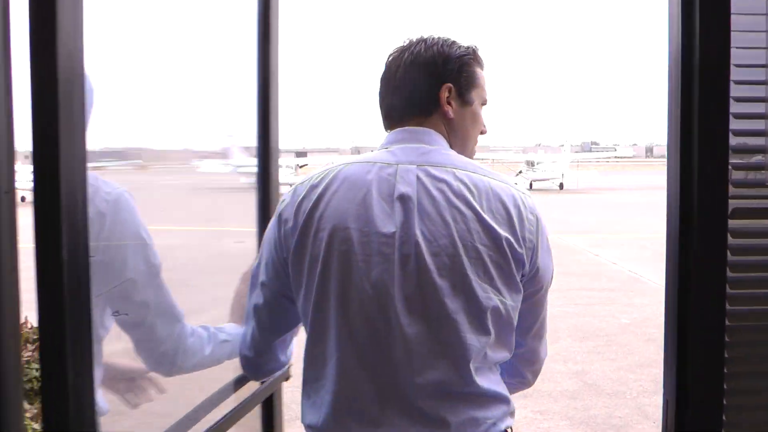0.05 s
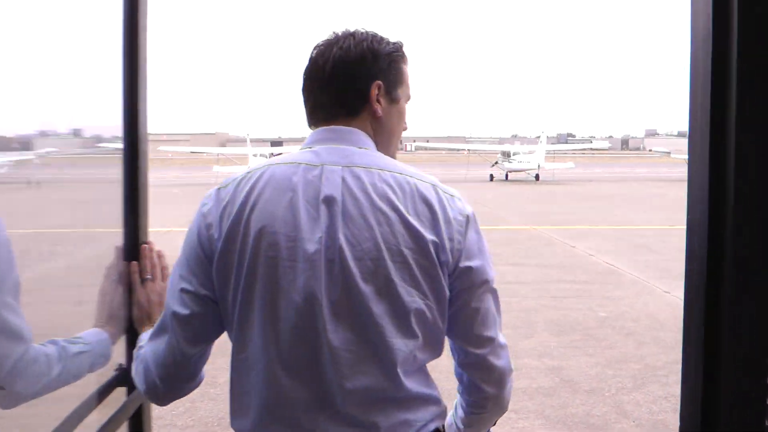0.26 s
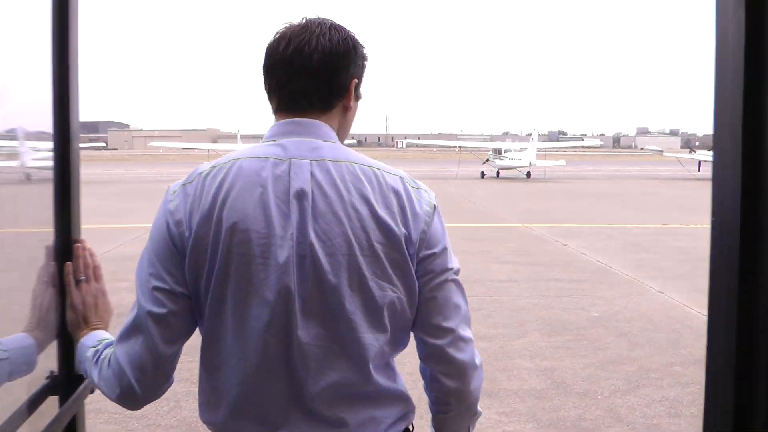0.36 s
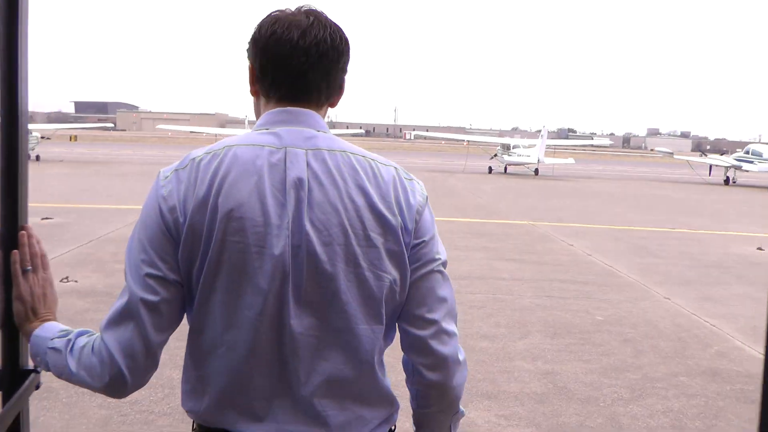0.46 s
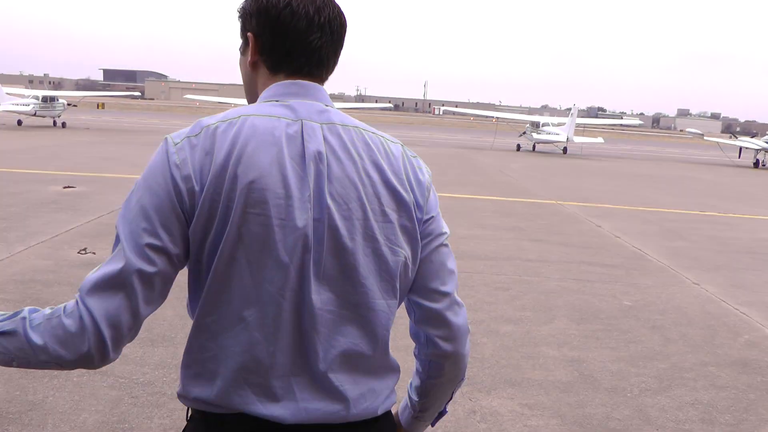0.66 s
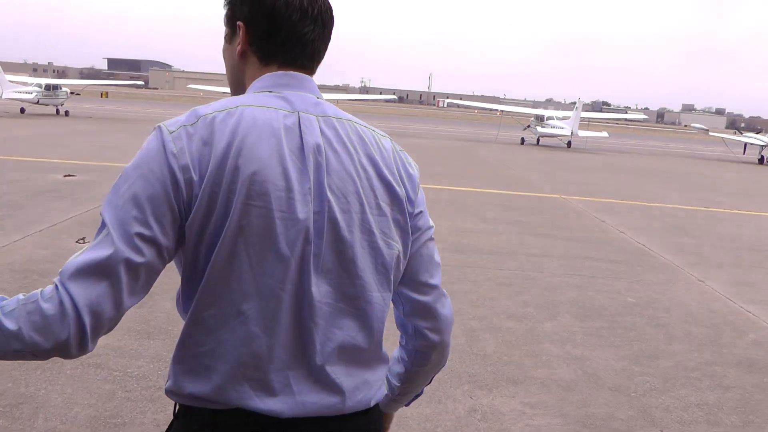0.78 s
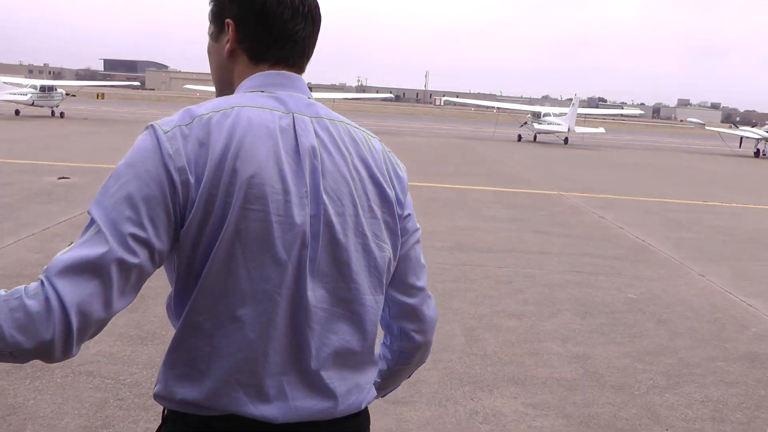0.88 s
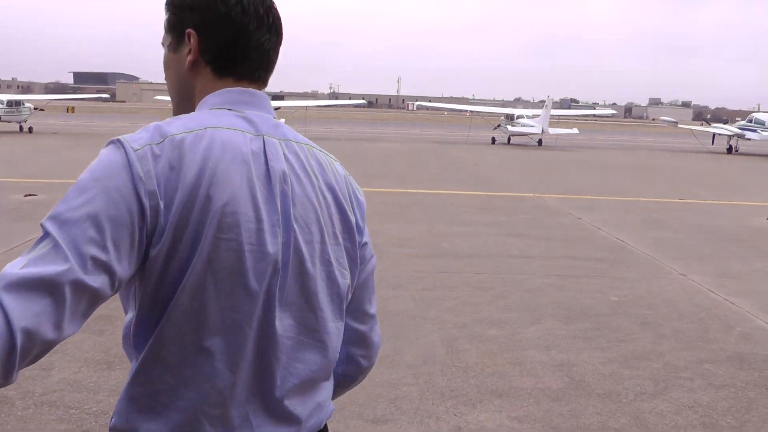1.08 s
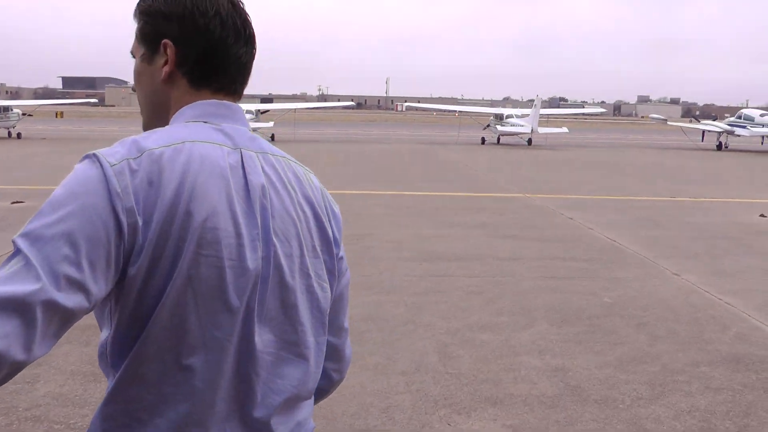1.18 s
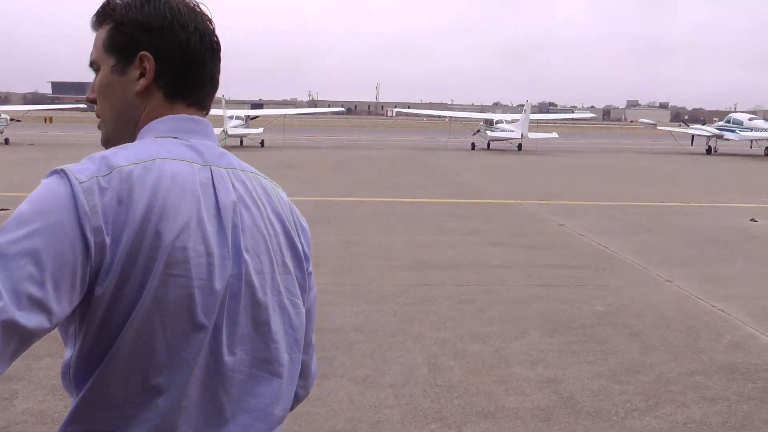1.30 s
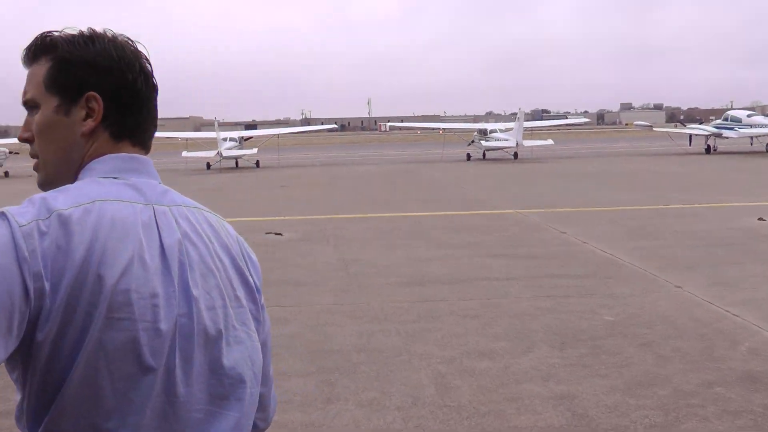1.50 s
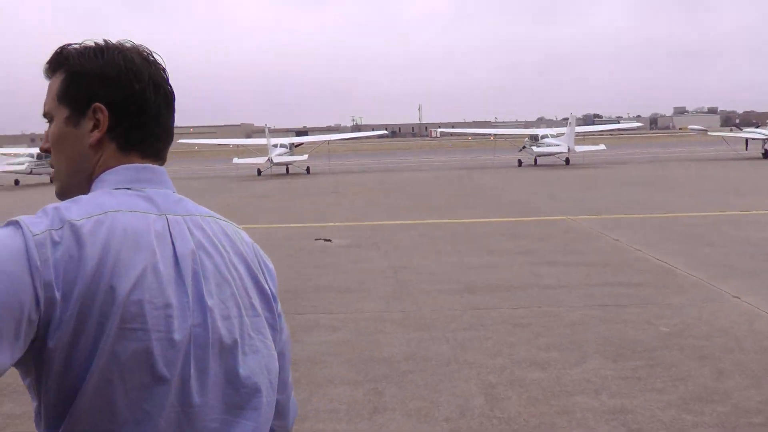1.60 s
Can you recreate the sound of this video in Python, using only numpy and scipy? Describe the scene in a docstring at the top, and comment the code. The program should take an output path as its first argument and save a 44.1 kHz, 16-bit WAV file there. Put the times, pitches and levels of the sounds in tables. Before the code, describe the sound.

A glass door opens with a push bar click, then a high, falling hinge squeal from 0.2 to 0.4 seconds, ending in a knock. Its closer hisses faintly, and at about 1.1 seconds the door clunks against its stop with a brief metallic rattle. Shoes scuff through to 1.5 seconds. From 0.5 seconds, soft lobby ventilation gives way to a low rumble and a distant aircraft engine.

```python
"""An airfield, reached from a lobby through a metal-framed glass door. The push bar clicks, the hinge
sticks and slips in a falling squeal, and the door's edge knocks free of the jamb. Fluid hisses and
whistles faintly through the closer's valve, then the door clunks against its stop, ringing frame and pane.
Shoes scuff over the threshold. The lobby's ventilation falls behind as the rumble of the apron and the
drone of a distant aircraft engine come in through the opening."""
import sys
import numpy as np
from scipy import signal
from scipy.fft import rfft, irfft
from scipy.io import wavfile
from scipy.ndimage import uniform_filter1d

SR = 44100
rng = np.random.default_rng(int(sys.argv[2]) if len(sys.argv) > 2 else 0)


def file_out(sig):
    """Save sig as 16-bit WAV at sys.argv[1]."""
    # one column per channel
    cols = np.atleast_2d(sig).T
    # limit, then scale
    lim = np.clip(cols, -1, 1)
    pcm = np.round(lim * 32767).astype(np.int16)
    wavfile.write(sys.argv[1], SR, pcm)


N = 72765

# spectrum of rubbing, for the scuffs and the hinge's grind: frequency_hz, level_db
FRICTION_COLOUR = [(150, 2.5), (400, -5.5), (1000, 2.5), (2500, -3.5), (5000, -4.5), (8000, -13),
                   (13000, -23), (16000, -23)]


def undb(db):
    """Decibels to gain."""
    return 10 ** (np.asarray(db) / 20)


def unit(x):
    """Scale to rms 1."""
    return x / np.sqrt(np.mean(x ** 2) + 1e-20)


def clock():
    """Time of each sample in seconds."""
    return np.arange(N) / SR


def curve(table, col=1):
    """One column of a table, joined by straight lines in time."""
    rows = np.array(table)
    return np.interp(clock(), rows[:, 0], rows[:, col])


def loudness(table, col=1):
    """Gain from a dB column, silent outside the table's span."""
    inside = (clock() > table[0][0]) & (clock() < table[-1][0])
    return undb(curve(table, col)) * uniform_filter1d(inside * 1., size=200)


def noise(colour, tilt_db=0):
    """Noise with a spectrum of (Hz, dB) points, tilted per octave above about 250 Hz."""
    rows = np.array(colour)
    octave = np.log2(np.fft.rfftfreq(N, 1 / SR) + 1)
    db = np.interp(octave, np.log2(rows[:, 0]), rows[:, 1]) + tilt_db * np.maximum(octave, 8)
    return unit(irfft(rfft(rng.standard_normal(N)) * undb(db), N))


def band(hz, width_hz):
    """Noise in one steep resonance; at 0 Hz, a random wander."""
    detuning = 2 * (np.fft.rfftfreq(N, 1 / SR) - hz) / width_hz
    return unit(irfft(rfft(rng.standard_normal(N)) / (1 + detuning ** 2) ** 2, N))


def strike(start, t60, attack=0.00022):
    """Straight attack, exponential decay; times in seconds."""
    age = np.maximum(clock() - start, 0)
    return np.minimum(age / attack, 1) * np.exp(-np.log(1000) * np.maximum(age - attack, 0) / t60)


def turn(hz):
    """Phase of a moving pitch."""
    return 2 * np.pi * np.cumsum(hz) / SR


def ring(modes, start):
    """Decaying modes struck at one moment, starting near rms 1."""
    ringing = sum(undb(db) * strike(start, t60) * np.sin(2 * np.pi * (hz * clock() + rng.random()))
                  for hz, db, t60 in modes)
    return ringing / np.sqrt(sum(undb(db) ** 2 for _, db, _ in modes) / 2)


def stereo(mid, side):
    """Left and right from mid and side."""
    return np.array([mid + side, mid - side])


def doorway(x, wet_db):
    """Direct sound plus the dense, bright echoes of the glazed lobby."""
    def tail():
        body = band(0, 13400) * strike(0.00305, t60=0.34)
        treble = 1.25 * band(7200, 11300) * strike(0.002, t60=0.47)
        early_lift = 1 + 1.36 * strike(0.00384, t60=0.027)
        response = (body + treble) * early_lift
        return signal.fftconvolve(x, response / np.sqrt(2 * np.sum(response ** 2)))[:N]
    return x + undb(wet_db) * stereo(tail(), 0.48 * tail())


def lobby():
    """Ventilation rushes and hums, fading as the lobby falls behind."""
    # spectrum of the room's air: frequency_hz, level_db
    air_colour = [(15, -37), (25, -9), (293, 1), (416, -9), (575, -7.5), (659, -7), (887, -9), (1740, -14),
                  (2110, -12), (3430, -19), (3720, -14), (4250, -15.5), (7510, -22.5), (8590, -28.5),
                  (16000, -36)]
    leave_s, fade_db_per_s = 0.65, 5.5
    air = undb(-46) * stereo(noise(air_colour), .23 * noise(air_colour))
    vent = undb(-54) * band(268.8, width_hz=37)
    fade_db = -fade_db_per_s * np.maximum(clock() - leave_s, 0)
    return (air + vent) * undb(fade_db + 0.31 * band(0, 58))


def airfield():
    """The apron's rumble swells and a wavering engine drone comes in as the door opens."""
    # spectrum of the rumble: frequency_hz, level_db
    apron_colour = [(25, -44), (55, -14), (85, 0), (130, 4), (200, -3.5), (350, -9), (700, -11.5),
                    (1500, -25.5), (4000, -30), (16000, -62)]
    # its swell as the doorway widens: time_s, level_db
    apron_level = [(0, -52), (.4, -51), (.62, -47.5), (1.0, -43.5), (1.3, -45), (1.65, -44.5)]
    engine_hz, open_s, rise_s = 92.2, 0.51, 0.055
    rumble = undb(curve(apron_level)) * stereo(noise(apron_colour), .22 * noise(apron_colour))
    phase = turn(engine_hz * (1 + 0.0088 * band(0, 20)))
    engine = np.sqrt(2) * np.sin(phase) * undb(-49 + 2 * band(0, 60))
    opening = (1 + np.tanh((clock() - open_s) / rise_s)) / 2
    return rumble + engine * opening


def push_bar():
    """One metallic click: a crack of noise and the bar's short ring."""
    # modes of the bar: pitch_hz, level_db, t60_s
    modes = [(1250, -4.5, 0.018), (2220, -3, 0.041), (2530, -2, 0.028), (3327, -6.5, 0.017),
             (4600, -13, 0.018), (5900, -12, 0.013)]
    # spectrum of the crack: frequency_hz, level_db
    colour = [(300, -25), (900, -10), (2300, 0), (3600, 3), (6000, -14), (9000, -22.5), (16000, -44)]
    push_s = .0502
    crack = 0.6 * strike(push_s, t60=0.031) * noise(colour)
    return doorway(undb(-27.5) * (0.91 * ring(modes, push_s) + crack), wet_db=-4.5)


def hinge():
    """Stick-slip squeal: a sinking near-sine, clean and then chattering, that beats with its echoes."""
    # glide of the squeal: time_s, pitch_hz
    pitch = [(.17, 3707), (.21, 3688), (.244, 3664), (.272, 3619), (.292, 3603), (.328, 3490), (.346, 3474),
             (.392, 3412), (.42, 3360), (.44, 3370)]
    # envelope of the fundamental: time_s, level_db
    level = [(.165, -60), (.19, -56), (.213, -22.5), (.232, -24), (.242, -18), (.256, -21.5), (.266, -15.5),
             (.287, -21), (.297, -33.5), (.311, -23), (.325, -35.5), (.35, -24.5), (.395, -23),
             (.412, -26.5), (.432, -34.5), (.445, -68)]
    # envelopes of the harmonics: time_s, second_db, third_db
    harmonics = [(.19, -68, -84), (.213, -41, -56.5), (.24, -44, -53), (.265, -34, -57),
                 (.297, -35.5, -49.5), (.33, -40, -54.5), (.36, -38, -78), (.41, -48, -58), (.43, -65, -77)]
    # stereo position: time_s, left_minus_right_db
    pan = [(.2, -10), (.23, -8), (.265, -2), (.33, 2), (.395, 1), (.42, 1.5)]
    # reflections off glass and walls, before their fade: delay_s, level_db
    reflections = [(.024, -17.5), (.052, -10.5), (.078, -29)]
    chatter_s, echo_fade_s, echo_fade_db_per_s = 0.3, 0.27, 115
    t = clock()
    chatter = np.clip((t - chatter_s) / 0.024 + .5, 0, 1)  # the contact turns rough
    roughness = .02 + 0.16 * chatter
    jitter = .0012 * (0.54 + chatter) * band(0, 640)
    phase = turn(curve(pitch) * (1 + jitter))
    half_orders = undb(-12) * (1 - chatter) * (np.sin(1.5 * phase) + np.sin(2.5 * phase))
    upper = np.sin(3 * phase) + undb(-16) * np.sin(4 * phase) + half_orders
    tone = loudness(level) * np.sin(phase) * (1 + 0.4 * roughness * band(0, 440))
    overtones = loudness(harmonics, 1) * np.sin(2 * phase) + loudness(harmonics, 2) * upper
    flutter = undb(2 * band(0, 200))
    tone += overtones * flutter * (1 + 0.68 * roughness * band(0, 420))
    grind = undb(-49) * chatter * (t < level[-1][0]) * noise(FRICTION_COLOUR)
    echoes = sum(undb(db) * np.interp(t - delay, t, tone) for delay, db in reflections)
    # the squeal's echoes fade out, leaving a single tone
    echoes *= undb(-echo_fade_db_per_s * np.maximum(t - echo_fade_s, 0))
    squeal = doorway(np.sqrt(2) * (tone + echoes) + grind, wet_db=-15)
    pan_db = curve(pan)
    return squeal * undb(np.array([pan_db, -pan_db]) / 2)


def draught():
    """A soft low puff of air as the door unseals."""
    peak_s, width_s = 0.294, 0.072
    swell = np.exp(-((clock() - peak_s) / width_s) ** 2)
    return undb(-51) * swell * np.array([band(40, width_hz=70), band(40, width_hz=70)])


def walker():
    """Shoes and sleeves rub in gritty scuffs; the feet land with dull thuds."""
    # shoe and sleeve scuffs: start_s, level_db, tilt_db_per_octave, attack_s, t60_s
    scuffs = [(.286, -44, -1.5, .002, 0.064), (0.501, -36.5, 3.5, 0.0025, 0.08),
              (.772, -48, 4, .004, 0.065), (0.917, -37.5, 6, .002, 0.077), (0.947, -46, 2.5, 0.0062, 0.33),
              (1.028, -41.5, 0, 0.0028, 0.087), (1.219, -50, 5, 0.0049, 0.34),
              (1.293, -46, 6, 0.0029, 0.059), (1.339, -38.5, -0.5, .002, 0.12),
              (1.424, -46, 2.5, 0.0037, 0.041), (1.461, -40, 3, 0.0053, 0.037),
              (1.4918, -36, -3, 0.00033, 0.048), (1.517, -41, 4, 0.0045, .07),
              (1.537, -47.5, 3, 0.0021, 0.2)]
    # soft footfalls: start_s, level_db, centre_hz, t60_s
    footfalls = [(.94, -39.5, 610, 0.18), (.985, -40.5, 271.6, 0.19)]
    grit = unit(undb(1.2 * band(0, 1650)))
    rubbing = sum(undb(db) * strike(start, t60, attack) * noise(FRICTION_COLOUR, tilt)
                  for start, db, tilt, attack, t60 in scuffs)
    steps = sum(undb(db) * strike(start, t60, attack=0.017) * band(hz, 1.2 * hz)
                for start, db, hz, t60 in footfalls)
    return doorway(grit * rubbing + steps, wet_db=-6.5)


def jamb():
    """The door's edge knocks free, the heaviest knock thumps the leaf, and loose fittings chink."""
    # knocks of the edge on the jamb: start_s, level_db, t60_s
    knocks = [(.349, -34.5, 0.057), (.431, -23, 0.027), (.436, -20, 0.012), (0.438, -30, 0.065)]
    # their dull spectrum: frequency_hz, level_db
    knock_colour = [(88, -33), (150, -19.5), (303, 1), (457, -7), (1120, -5.5), (1500, -8), (1630, -8),
                    (2500, -7.5), (2700, -5.5), (3700, -10.5), (4950, -11.5), (8900, -35), (16000, -56)]
    # faint chinks of the fittings: start_s, level_db
    chinks = [(.293, -57), (.3845, -43), (0.469, -51), (.501, -57.5), (0.919, -41.5)]
    # blurred modes of the fittings: centre_hz, level_db, t60_s
    fitting_modes = [(8500, 1.5, 0.055), (9740, -4, 0.078), (11450, -0.5, .05), (12350, 2, .07),
                     (13200, -2, .05), (13800, -4, .06)]
    knocking = sum(undb(db) * strike(start, t60) for start, db, t60 in knocks) * noise(knock_colour)
    leaf_hz = 302
    leaf = np.sqrt(2) * np.sin(2 * np.pi * leaf_hz * clock())
    thump = undb(-38) * strike(.4355, t60=0.07, attack=0.0029) * leaf
    chinking = 0
    for hz, mode_db, t60 in fitting_modes:
        envelope = sum(undb(db) * strike(start, t60, attack=0.0034) for start, db in chinks)
        chinking += undb(mode_db) * band(hz, width_hz=500) * envelope
    return doorway(knocking + thump + chinking / np.sqrt(len(fitting_modes)), wet_db=-3.5)


def closer():
    """Fluid forced through the closer's valve: a narrow hiss, then a thin rising whistle."""
    # hiss of the valve: time_s, centre_hz, level_db
    hiss_path = [(.38, 5070, -54), (.48, 4950, -56), (.56, 4924, -55), (.64, 4890, -50), (.73, 4717, -60),
                 (.79, 4740, -50), (.85, 4460, -65), (.96, 4390, -66.5), (1.06, 4600, -57)]
    # whistle of the valve: time_s, pitch_hz, level_db
    whistle_path = [(.8, 4010, -73), (.88, 3980, -55.5), (.95, 4245, -56.5), (1.0, 4200, -53),
                    (1.06, 4360, -52)]
    hiss = loudness(hiss_path, 2) * band(0, width_hz=1040) * np.sin(turn(curve(hiss_path)))
    whistle_hz = curve(whistle_path) * (1 + 0.0048 * band(0, 340))
    whistle = loudness(whistle_path, 2) * np.sin(turn(whistle_hz))
    return doorway(np.sqrt(2) * (hiss + whistle), wet_db=-4)


def door_stop():
    """The door hits its stop and rattles; each blow cracks and feeds the ring of frame and pane."""
    # blows, then rattles: start_s, level_db, tilt_db_per_octave, t60_s, ring_send_db
    blows = [(1.0611, -22.5, -2.5, 0.025, -15.5), (1.0632, -21.5, -1, 0.04, -11),
             (1.0675, -20, 1.5, 0.049, -4.5), (1.0795, -23.5, 1.7, 0.12, -16), (1.096, -29, 3, 0.13, -16),
             (1.121, -31, 3, 0.083, -24), (1.139, -35.5, 6, 0.09, -27), (1.159, -39, 4.5, 0.17, -14)]
    # spectrum of a crack, many short resonances: frequency_hz, level_db
    crack_colour = [(100, -38), (200, -17), (330, 0.5), (560, -3.5), (900, 0), (1250, 0), (1800, -2.5),
                    (2750, 1.5), (3400, -4.5), (5600, -9.5), (8500, -19.5), (13000, -24), (16000, -33)]
    # modes of frame and pane: pitch_hz, level_db, t60_s
    modes = [(351, -12.5, 0.22), (713, -7, 0.44), (1001, -13.5, .2), (1437, -24, 0.1), (1906, -1, 0.15),
             (2310, -12, 0.33), (2614, -11, 0.19), (2746, 2.5, 0.15), (2990, -7, 0.1), (2922, 1, 0.17),
             (3695, -4.5, 0.083), (4140, -4, 0.099), (4380, -3, 0.15), (5050, -17, 0.31)]
    jitter_hz = 11.8
    cracks = sum(undb(db) * strike(start, t60) * noise(crack_colour, tilt)
                 for start, db, tilt, t60, _ in blows)
    ringing = 0
    for hz, mode_db, t60 in modes:
        energy = sum((undb(db + send_db) * strike(start, t60)) ** 2 for start, db, _, _, send_db in blows)
        phase = turn(hz + jitter_hz * band(0, 416))
        ringing += undb(mode_db) * np.sqrt(energy) * np.sin(phase)
    return doorway(cracks, wet_db=-8) + doorway(undb(-5) * ringing, wet_db=-10.5)


def scene():
    """The hinge follows its own pan; everything else sits slightly to the right."""
    right_db = 1.0
    rest = push_bar() + jamb() + door_stop() + closer() + walker() + lobby() + airfield() + draught()
    return hinge() + rest * undb(np.array([[-right_db], [right_db]]) / 2)


def record(dry):
    """The microphone narrows to mono in the high treble and cuts the top."""
    # stereo width across the spectrum: frequency_hz, side_db
    width = [(30, 10), (100, -3), (300, 1), (1000, 4.5), (2500, 1.5), (7000, -1.5), (9500, 1.5),
             (11000, -30)]
    top_hz = 16600
    hz, side_db = np.array(width).T
    side_gain = undb(np.interp(np.fft.rfftfreq(N, 1 / SR), hz, side_db))
    mid = (dry[0] + dry[1]) / 2
    side = irfft(rfft((dry[0] - dry[1]) / 2) * side_gain, N)
    top_cut = signal.ellip(10, .2, 80, top_hz, fs=SR, output="sos")
    return signal.sosfilt(top_cut, stereo(mid, side))


dry = scene()
out = record(dry)
file_out(out)
```